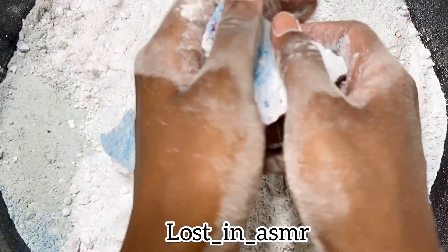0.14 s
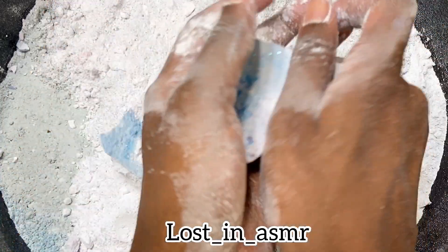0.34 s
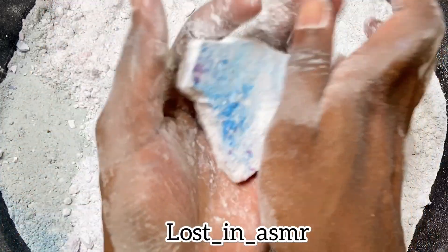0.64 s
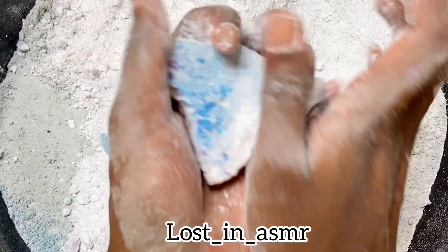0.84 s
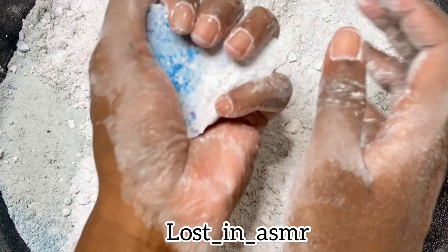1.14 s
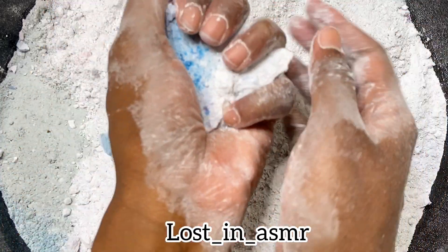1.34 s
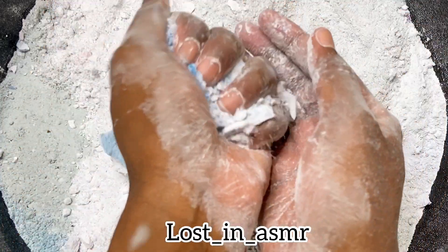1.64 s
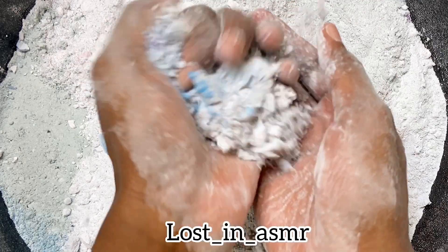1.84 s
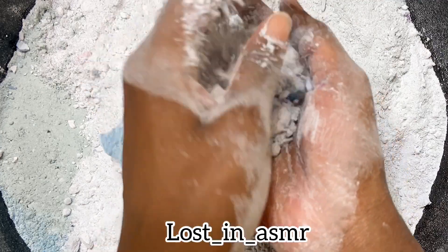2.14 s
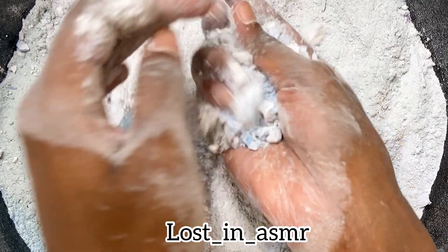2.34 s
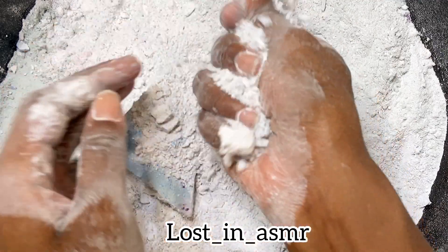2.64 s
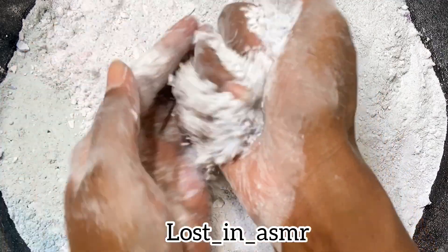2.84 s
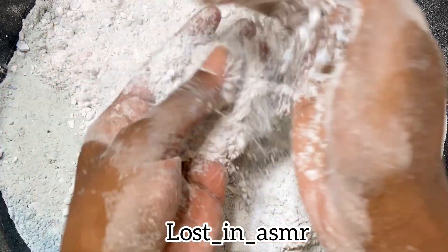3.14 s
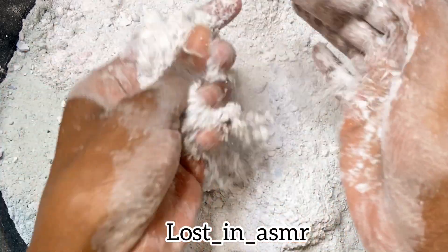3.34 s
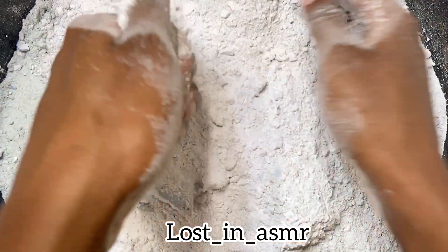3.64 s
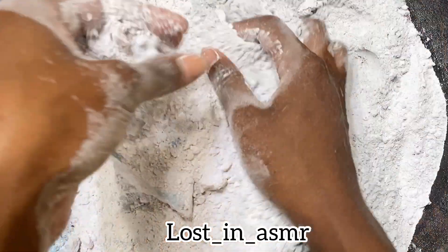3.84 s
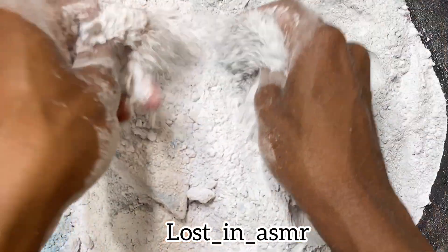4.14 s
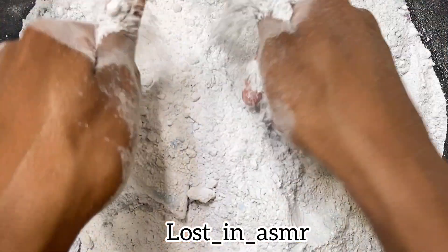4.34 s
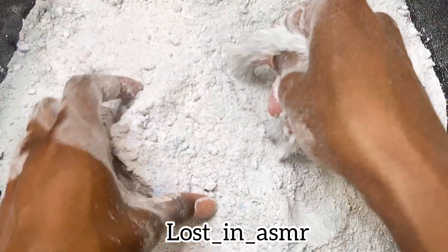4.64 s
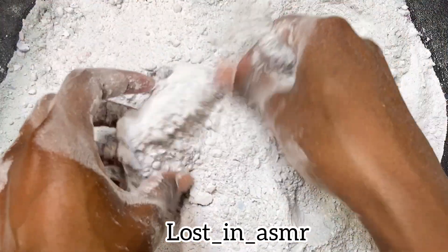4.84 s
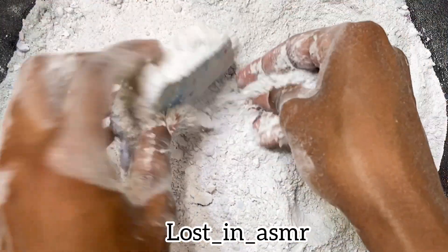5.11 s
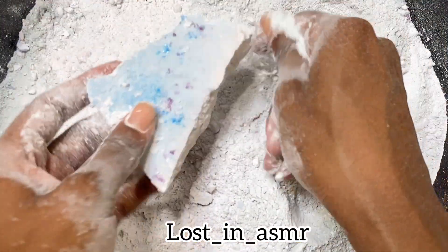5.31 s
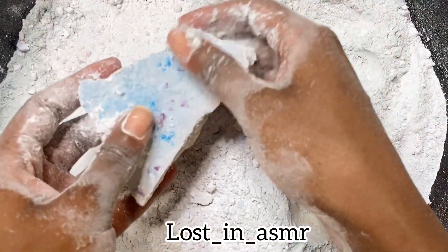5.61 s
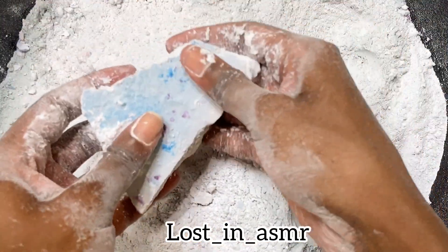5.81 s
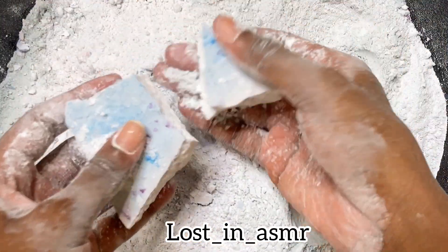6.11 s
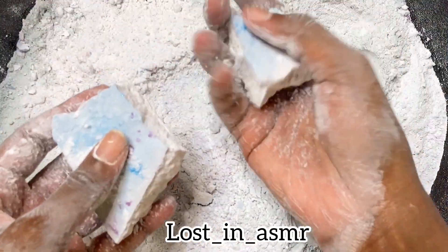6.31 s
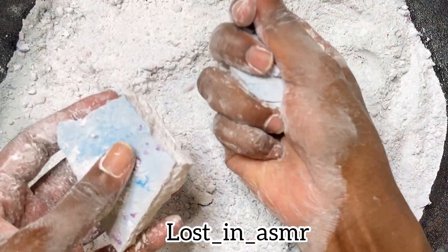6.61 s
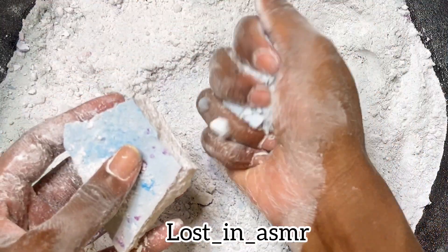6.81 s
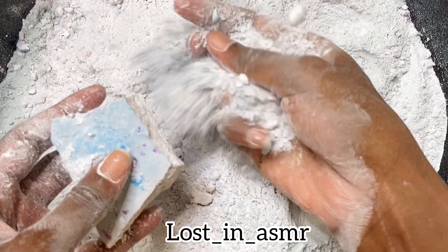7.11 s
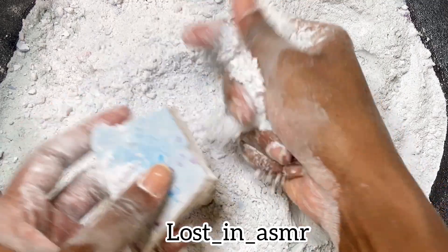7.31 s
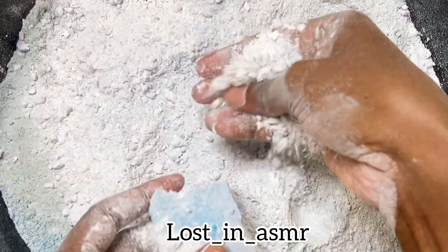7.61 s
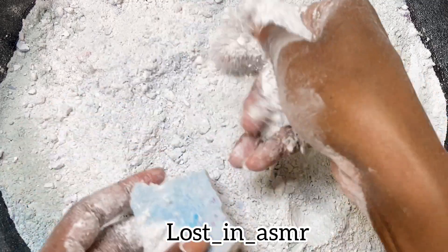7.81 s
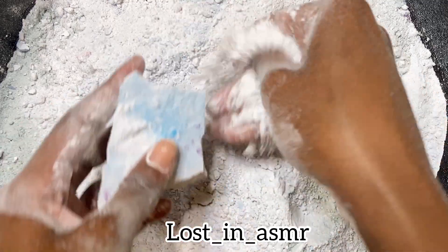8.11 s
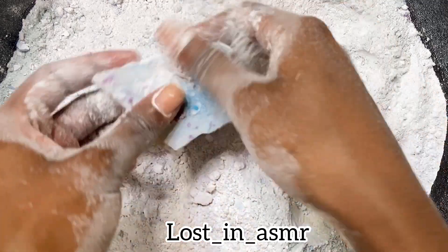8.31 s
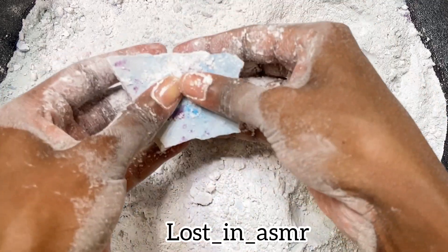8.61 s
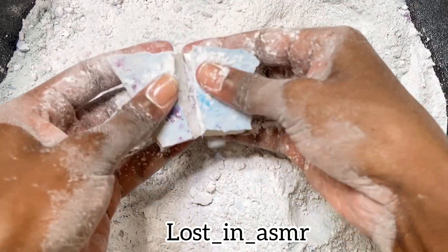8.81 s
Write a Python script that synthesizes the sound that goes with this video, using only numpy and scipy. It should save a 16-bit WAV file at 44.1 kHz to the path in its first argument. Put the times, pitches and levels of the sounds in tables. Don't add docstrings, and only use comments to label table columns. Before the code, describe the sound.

Two hands snap and crush dry blocks of pressed chalk close up, with sharp cracks, crumbling crackles and dusty rubbing over low room rumble.

```python
import sys
import numpy as np
from scipy import signal
from scipy.fft import rfft, irfft, next_fast_len
from scipy.io import wavfile
from scipy.ndimage import uniform_filter1d

SR = 44100
rng = np.random.default_rng(int(sys.argv[2]) if len(sys.argv) > 2 else 0)


def dump_mix(stems):
    frames = np.atleast_2d(stems).T
    limited = np.clip(frames, -1, 1)
    pcm = np.round(limited * 32767).astype(np.int16)
    wavfile.write(sys.argv[1], SR, pcm)


def rack_gain(trim_db):
    fader = np.asarray(trim_db, float)
    return 10 ** (fader / 20)


N = 394694
FFT_SIZE = next_fast_len(N)

# pitch in Hz, pitch wander in Hz.
ROOM_MODES = [(57, 4.24), (110, 7.92)]


def level(x, db):
    return x * rack_gain(db) / np.sqrt(np.mean(x ** 2))


def peak(x, db):
    return x * rack_gain(db) / np.max(np.abs(x))


def edge(x, hz, kind, order=2):
    return signal.sosfilt(signal.butter(order, hz, kind, fs=SR, output="sos"), x)


def resonate(x, modes):
    out = 0
    for k, (hz, width, db) in enumerate(modes):
        b, a = signal.iirpeak(hz, hz / width, fs=SR)
        out = out + (-1) ** k * rack_gain(db) * signal.lfilter(b, a, x)
    return out


def walk(rate):
    k = int(SR / rate)
    steps = np.repeat(rng.standard_normal(N // k + 1), k)
    return 1.41 * uniform_filter1d(uniform_filter1d(steps, k), k)[:N]


def pair(count, like):
    like = np.clip(like, 0, 1)
    shared, left, right = rng.standard_normal((3, count))
    return np.sqrt(like) * shared + np.sqrt(1 - like) * np.array([left, right])


def grains(rate, spread_db, burst_s, like, largest=4):
    when, size = rng.random(N), rng.exponential(size=N)
    starts = (when < rate / SR) * rack_gain(2 * spread_db * np.minimum(size, largest))
    power = signal.lfilter([1], [1, -np.exp(-2 / (burst_s * SR))], starts)
    return np.sqrt(power + 0.2 * np.mean(power)) * pair(N, like)


def burst(rise_s, fall_s, like):
    t = np.arange(4096) / SR - .006
    envelope = np.where(t < 0, np.exp(np.minimum(t, 0) / rise_s), np.exp(-t / fall_s))
    return pair(4096, like) * envelope


def click(rough, rise_s, fall_s):
    impulse = np.arange(4096) == int(.006 * SR)
    return rough * burst(rise_s, fall_s, like=0.6) + impulse


def gestures(table, rise_db_s, fall_db_s):
    t = np.arange(0, N + 64, 64) / SR
    start, hold, db, *others = np.array(table).T[:, :, None]
    early, late = np.maximum(start - t, 0), np.maximum(t - start - hold, 0)
    shape = db - rise_db_s * early - fall_db_s * late
    powers = [np.sum(rack_gain(2 * (shape + more)), axis=0) for more in [0] + others]
    return [np.interp(np.arange(N) / SR, t, power) for power in powers]


def played(table):
    s, *columns = np.transpose(table)
    return [np.interp(np.arange(N) / SR, s, c) for c in columns]


def along(table, hz):
    points, values = np.transpose(table)
    return np.interp(np.log(np.maximum(hz, 1)), np.log(points), values)


def room_modes():
    # start in seconds, hold in seconds, level in dB.
    low_surges = [(0, 0.061, -23.5), (0.29, 0.058, -30.5), (0.676, 0.073, -30.5), (0.88, 0.042, -29),
                  (0.983, 0.22, -34), (1.357, 0.079, -34), (1.698, 0.21, -34.5), (2.27, 0.15, -28),
                  (2.848, 0.11, -26.5), (3.263, 0.036, -30), (3.428, 0.044, -32), (3.738, 0.027, -30),
                  (3.977, 0.1, -29.5), (4.432, 0.2, -30), (4.947, 0.21, -31), (5.994, 0.05, -30),
                  (6.16, 0.11, -29), (6.35, 0.13, -34), (6.593, 0.017, -32), (7.153, 0.082, -27.5),
                  (7.483, 0.1, -33), (8.63, 0.03, -33)]
    high_surges = [(0.45, 0.02, -38), (0.66, 0.056, -33), (1.15, 0.054, -37.5), (1.35, 0.051, -38.5),
                   (1.87, 0.051, -33.5), (2.0, 0.19, -35), (2.46, 0.034, -36.5), (2.79, 0.022, -34),
                   (3.82, 0.18, -36), (4.29, 0.02, -36), (5.33, 0.03, -42), (5.59, 0.04, -33.5),
                   (5.81, 0.04, -33.5), (6.0, 0.035, -42), (6.34, 0.13, -44), (6.86, 0.091, -36.5),
                   (7.4, 0.03, -36), (7.64, 0.19, -35.5), (8.06, 0.068, -36.5), (8.35, 0.027, -34),
                   (8.65, 0.041, -37), (8.87, 0.018, -34.5)]
    calm_db = (-38.5, -44.5)
    out = 0
    for (hz, wander), surges, calm in zip(ROOM_MODES, (low_surges, high_surges), calm_db):
        surge, = gestures(surges, rise_db_s=255, fall_db_s=255)
        size = np.sqrt(surge + rack_gain(2 * (calm + 3.5 * walk(12))))
        phase = 2 * np.pi * np.cumsum(hz + wander / 2 * walk(9)) / SR
        out = out + np.sqrt(2) * np.sin(phase) * size * rack_gain(1.76 * walk(22))
    return out * np.ones((2, 1))


def air():
    # frequency in Hz, level in dB per Hz.
    air_colour = [(15, -46), (25, -1), (58, -1.5), (116, 3.5), (242, -18), (334, -17), (420, -26),
                  (553, -26.5), (936, -51.5), (1210, -69), (1740, -43), (3160, -57), (6000, -76),
                  (7800, -92), (13200, -120)]
    # frequency in Hz, shared part from 0 to 1.
    air_like = [(60, .985), (130, .9), (290, .5), (700, .5)]
    air_db = -46
    hz = np.fft.rfftfreq(FFT_SIZE, 1 / SR)
    like = np.clip(along(air_like, hz), 0, 1)
    shared, left, right = rfft(rng.standard_normal((3, FFT_SIZE)))
    both = np.sqrt(like) * shared + np.sqrt(1 - like) * np.array([left, right])
    both = both * rack_gain(along(air_colour, hz))
    for mode_hz, wander in ROOM_MODES:
        both = both * (1 - 0.49 * np.exp(-((hz - mode_hz) / (3.1 * wander)) ** 2))
    noise = irfft(both, FFT_SIZE)[:, :N]
    band = edge(edge(noise, 130, "high", order=4), 400, "low", order=4)
    return noise * rack_gain(air_db + 4) / np.sqrt(np.mean(band ** 2))


def rubbing():
    # time in seconds, grit in dB, dust relative to grit in dB.
    contact = [(0, -50.5, -9.5), (.85, -55, -4.5), (1.12, -63.5, -5.5), (1.3, -49.5, -13), (2.1, -49, -8.5),
               (3.6, -51, -17), (3.88, -58.5, -1.5), (4.45, -49.5, -13.5), (4.95, -57.5, -6),
               (5.35, -52.5, -8), (5.42, -59, -8), (5.92, -70, -7.5), (5.97, -56.5, -2.5),
               (7.0, -51.5, -10), (8.35, -51.5, -8), (8.5, -73.5, -2), (8.8, -61.5, -15), (8.95, -55, 5.5)]
    # start in seconds, hold in seconds, grit in dB, dust relative to grit in dB.
    strokes = [(0, 0.033, -46, -2.5), (.13, 0.0062, -46, 1), (.6, 0.024, -42, -4.5), (.74, 0.01, -51, -3),
               (.96, 0.014, -49.5, -10.5), (1.2, 0.02, -41.5, -14), (1.34, 0.025, -45.5, -12),
               (1.47, 0.019, -35.5, -17), (1.66, 0.065, -43, -9), (1.87, 0.065, -51, 3),
               (2.25, 0.12, -43.5, -10.5), (2.39, 0.22, -45.5, -8.5), (2.68, 0.054, -43.5, -7),
               (2.77, 0.11, -56, 0), (2.96, 0.13, -53.5, -4), (3.16, 0.076, -49.5, -5.5),
               (3.29, 0.05, -45, -7), (3.38, 0.2, -46, -10), (4.04, 0.057, -42, -11.5),
               (4.19, 0.11, -45, -6), (5.11, 0.017, -46, -3.5), (5.22, 0.057, -48, -5),
               (6.1, 0.024, -52.5, 1), (6.18, 0.032, -53.5, 7.5), (6.27, 0.03, -49, 1),
               (6.36, .03, -46.5, -8), (6.42, 0.12, -40.5, -19), (6.69, 0.048, -38.5, -12),
               (6.78, 0.055, -47, -3.5), (7.1, .11, -43.5, -12), (7.26, 0.054, -46.5, -9.5),
               (7.53, 0.0085, -57, 3), (7.65, 0.085, -44.5, -7), (7.98, 0.2, -47, -4.5),
               (8.68, 0.043, -46, -19), (8.42, 0.014, -52, -3.5), (.38, 0.03, -60.5, 5),
               (4.45, 0.16, -55.5, -4.5), (4.64, 0.082, -49.5, -9.5), (3.95, 0.036, -50, -9),
               (5.82, 0.025, -51.5, -13), (5.96, 0.046, -54.5, -2.5), (8.85, 0.037, -55, 5)]
    swipes = [(.478, .006, -56, 5.5), (.565, 0.039, -46, 4.5), (.772, 0.015, -48.5, 4),
              (.862, 0.007, -47, -4), (.906, .006, -53, 0), (3.71, .02, -55, 1.5), (5.58, 0.05, -53, -3),
              (6.835, 0.0087, -44, 2.5), (6.945, 0.027, -49, 3.5), (1.465, 0.021, -43, -8),
              (6.685, 0.028, -46, -9), (6.895, .01, -56, 5)]
    # centre in Hz, width in Hz, level in dB.
    block = [(2420, 1080, -4), (3290, 620, 3.5), (4820, 4060, -0.5), (6760, 3630, -3)]
    dust_bands = [(7200, 14000, -11), (8800, 6200, 38.5), (15100, 4000, -47)]
    rest_db, rest_dust_db = played(contact)
    slow = gestures(strokes, rise_db_s=301, fall_db_s=290)
    quick = gestures(swipes, rise_db_s=1500, fall_db_s=700)
    drag, drag_dust = np.add(slow, quick)
    grit_size = np.sqrt(drag + rack_gain(2 * rest_db))
    dust_size = np.sqrt(drag_dust + rack_gain(2 * (rest_db + rest_dust_db)))
    coarse = grains(900, spread_db=5.0, burst_s=0.0073, like=0.38, largest=3.03)
    fine = grains(1500, spread_db=5.0, burst_s=0.0078, like=0.73, largest=2.8)
    grit = edge(resonate(coarse, block), 1350, "high")
    dust = edge(resonate(fine, dust_bands), 3300, "high")
    stick_slip = rack_gain(1.17 * walk(30) + 0.21 * walk(25))
    return (grit_size * level(grit, -1.38) + dust_size * level(dust, 7.87)) * stick_slip


def cracks():
    # time in seconds, peak in dB, ring in Hz, grit and
    # thud relative to the peak in dB.
    snaps = [(0.003, -26.5, 576, -9, -8), (0.473, -28.5, 1740, -12, -12), (0.908, -33, 1570, -4, -0.5),
             (1.035, -35, 1590, -15, 1), (1.192, -23, 660, -1, -11), (1.334, -18, 1540, -4.5, -22),
             (1.449, -19.5, 1460, -22, -14), (2.363, -34, 540, -15, 5), (2.497, -19.5, 680, -12, -8.5),
             (2.611, -20.5, 1450, -14, -10), (2.75, -4.5, 895, -43, -13.5), (3.075, -27, 1280, -9, -16),
             (4.079, -31, 616, -16, 4), (5.759, -30, 1950, -12, -11), (5.793, -18.5, 560, -8, -6),
             (6.413, -18, 2440, -13, -13), (6.643, -18, 1230, -26, -9.5), (6.79, -20, 1430, -19, -16),
             (8.648, -10, 530, -16, -6), (8.669, -19.5, 580, -2.5, -6)]
    # time in seconds, peak in dB, ring in Hz, grit
    # relative to peak in dB.
    further_breaks = [(0.863, -43, 3060, 6), (1.175, -13, 810, -4), (1.327, -12, 1140, -10), (1.4, -20, 1420, -8),
                      (1.462, -13.5, 1380, -9), (1.481, -17.5, 1520, -4.5), (1.486, -19, 1500, -8),
                      (1.666, -22.5, 1400, -24), (2.95, -27.5, 1200, -8), (2.987, -21, 710, -18),
                      (3.0, -23, 660, -8), (3.277, -26, 1350, -24), (4.995, -27, 620, -28),
                      (5.158, -26, 1280, -24), (6.44, -10, 1190, -9.5), (6.451, -19, 2130, -12),
                      (6.502, -11, 1350, -14), (6.588, -22, 1390, -11), (6.615, -23.5, 835, -7.5),
                      (6.692, -13, 1530, -9), (6.686, -24.5, 800, -3), (6.699, -18, 1100, -5.5),
                      (6.837, -30.5, 710, 3.5), (6.884, -30.5, 1600, -5), (7.162, -24.5, 1460, -10),
                      (7.582, -23.5, 1420, -16), (8.002, -21, 654, -16)]
    common_thud_db = -18
    breaks = [*snaps, *((*row, common_thud_db) for row in further_breaks)]
    out = np.zeros((2, N + 4096 + 512))
    for s, peak_db, hz, grit_db, thud_db in breaks:
        piece = [(hz, 0.28 * hz, 0), (2.12 * hz, 0.57 * hz, -12), (3300, 2400, -19)]
        ring = resonate(click(.11, 0.00058, 0.0021), piece)
        crumbs = resonate(burst(0.0043, 0.022, like=0.37), [(0.8 * hz, 0.49 * hz, 0), (2400, 1800, -10)])
        body = edge(peak(ring, 0.85) + peak(crumbs, -14.0), 3940, "low", order=3)
        grit = edge(edge(burst(.0008, .002, like=.5), 1900, "high"), 7000, "low", order=3)
        dust = edge(burst(.0012, .0025, like=.9), 6500, "high")
        thud = resonate(burst(0.00077, 0.0096, like=0.92), [(181, 333, 1.0), (340, 425, 0.18)])
        sound = body + peak(grit, grit_db + 5.0) + peak(thud, thud_db - 1.0)
        sound = sound + peak(dust, grit_db)
        at = int((s - .0055) * SR) + 512
        out[:, at:at + 4096] += rack_gain(peak_db) * sound
    return out[:, 512:N + 512]


def scrapes():
    # start in seconds, end in seconds, hollow in Hz, level in dB.
    slides = [(0.087, 0.195, 3800, -47.5), (0.3, 0.34, 1870, -53), (0.496, 0.77, 5350, -51),
              (0.374, 0.88, 3430, -54.5), (0.559, 0.66, 3350, -44.5), (0.54, 0.68, 2370, -59),
              (0.932, 1.0, 1730, -55), (4.958, 5.03, 1470, -47.5), (0.717, .75, 6400, -46.5),
              (0.86, 0.897, 3060, -48), (3.653, 4.122, 220, -45.5), (4.963, 5.05, 714, -48),
              (5.475, 5.553, 1860, -59), (5.579, 5.665, 2120, -53), (5.955, 6.15, 4600, -56.5),
              (6.17, 6.225, 3100, -52), (6.173, 6.225, 5800, -44), (6.345, 6.405, 4700, -46),
              (6.356, 6.41, 2480, -51), (0.106, 0.2, 5330, -45), (6.25, 6.333, 4600, -48),
              (8.291, 8.364, 2850, -53), (8.823, 8.94, 5680, -49.5), (1.35, 1.54, 1540, -44),
              (1.65, 1.76, 1470, -44), (7.09, 7.34, 1510, -48.5), (7.51, 7.78, 1510, -49.5),
              (7.99, 8.1, 1490, -47.5), (2.76, 2.845, 600, -40.5), (8.652, 8.72, 540, -36),
              (5.797, 5.85, 515, -41.5), (6.24, 6.31, 3100, -54), (5.29, 5.35, 3150, -57),
              (5.36, 5.44, 1560, -58), (6.08, 6.15, 6500, -52), (0.56, 0.63, 6800, -50),
              (3.29, 3.33, 2200, -45), (3.2, 3.24, 1430, -47), (7.99, 8.09, 3200, -52),
              (6.45, 6.56, 2270, -44), (4.03, 4.1, 2800, -50)]
    out = np.zeros((2, N))
    for start, end, hz, db in slides:
        count = int((end - start) * SR)
        narrow = resonate(pair(8192 * 3, 0.87), [(hz, 70 + .065 * hz, 0)])
        friction = resonate(narrow, [(hz, 0.32 * hz, 0)])[:, :count]
        sound = friction * rack_gain(3.5 * walk(111.5)[:count])
        swell = np.sqrt(np.sin(np.pi * np.linspace(0, 1, count) ** 0.64))
        at = int(start * SR)
        out[:, at:at + count] += level(sound, db) * swell
    return out


def ticks():
    # time in seconds, peak in dB, ring in Hz.
    single_crumbs = [(0.307, -40.5, 730), (1.549, -36, 910), (1.608, -39, 600), (1.694, -29, 910),
                     (2.627, -25.5, 840), (3.176, -35, 736), (3.212, -35, 740), (4.453, -30, 700),
                     (1.37, -32, 1500), (1.42, -40, 1500), (1.51, -34, 1500), (1.715, -36, 1500),
                     (4.967, -39, 627), (5.048, -36, 600), (5.378, -44, 634), (5.477, -40, 1755),
                     (5.497, -38.5, 1840), (5.66, -49, 727), (6.469, -27, 1900), (6.737, -29, 1410),
                     (7.471, -45, 883), (7.876, -33.5, 730), (7.96, -39, 1490), (2.068, -38, 1490),
                     (2.09, -37, 1500), (2.198, -39, 560), (2.446, -34, 610), (2.49, -31, 1500),
                     (2.677, -47, 600), (3.919, -37, 780), (4.17, -43, 600), (4.181, -35, 600),
                     (4.345, -43, 720), (4.394, -42, 620), (4.418, -32.5, 1010), (4.621, -44, 560),
                     (4.697, -45, 1500), (4.808, -47, 1300), (5.007, -26.5, 680), (5.009, -36, 1540),
                     (5.078, -34, 1600), (5.105, -36, 895), (5.349, -43, 2800), (6.461, -34, 2300),
                     (6.477, -22.5, 1490), (6.485, -28, 2200), (6.512, -29, 2100), (6.531, -34, 1500),
                     (6.55, -33, 1300), (6.581, -25.5, 2200), (6.657, -39, 1100), (6.709, -34, 1900),
                     (6.716, -43, 1200), (6.782, -33, 1450), (6.865, -32, 905), (7.095, -37, 1400),
                     (7.527, -37, 1410), (7.566, -45, 600), (8.132, -35, 2250),
                     (0.48, -39, 11000), (0.93, -30, 6000), (2.496, -26, 5500), (2.56, -31, 6000),
             (3.08, -28.5, 5700), (4.4, -36, 3300), (5.437, -48, 3500), (5.661, -39, 4000),
             (5.699, -48, 4000), (5.805, -28, 7700), (6.467, -20, 5000), (6.737, -34, 6900),
             (6.844, -27, 4300), (7.14, -30, 4500), (8.418, -36.5, 2900), (8.657, -25, 5500),
             (6.692, -20.5, 2300), (6.837, -30, 2900), (6.44, -14.5, 2220), (8.617, -44, 3200),
             (5.497, -39, 3000), (2.75, -22, 2250), (2.75, -27, 4000), (5.793, -25.5, 3400),
             (5.759, -34.5, 4100), (1.445, -27, 3200), (1.212, -34, 4800), (4.465, -29, 2400),
             (3.92, -40, 5000), (2.279, -34, 3100), (1.2, -30, 1500), (1.195, -27, 4000),
                     (2.93, -36, 1350), (3.152, -37, 680), (3.405, -38, 530), (3.518, -33.5, 1030),
             (3.759, -39, 550), (4.089, -31, 520), (4.14, -36, 500), (4.217, -36, 555), (6.972, -45, 1420),
             (7.25, -35, 1460), (7.626, -35, 530), (7.673, -33, 780), (7.7, -28.5, 1500),
             (8.047, -30, 1450), (2.81, -32, 1500), (2.09, -38, 3500), (3.297, -37, 1300),
             (2.765, -21.5, 930), (1.177, -19, 780)]
    out = np.zeros((2, N + 4096))
    for s, peak_db, hz in single_crumbs:
        snap = resonate(click(0.12, 0.00025, 0.002), [(hz, 2.0 * hz, 0)])
        ring = resonate(snap, [(hz, 0.29 * hz, 0), (3500, 3500, -18)])
        sound = edge(ring, min(2500 + 3.9 * hz, 15000), "low")
        at = int((s - .0055) * SR)
        out[:, at:at + 4096] += peak(sound, peak_db + 3.0)
    return out[:, :N]


def crushing():
    # start in seconds, hold in seconds, palm crumbs in dB, finger gaps relative to palms in dB.
    squeezes = [(.92, 0.05, -65, 3), (1.195, 0.018, -43.5, -3.5), (1.345, 0.23, -54.5, 8),
                (1.44, 0.053, -43, -1), (1.64, 0.067, -50, 4.5), (1.84, 0.054, -51.5, 5),
                (2.24, 0.21, -44, 1.5), (2.49, 0.31, -46, 0), (2.77, 0.046, -40.5, -2.5),
                (2.96, 0.32, -50, 2), (3.22, 0.33, -50, 0.5), (3.68, 0.25, -47.5, -2), (3.92, 0.29, -47, 1),
                (4.41, 0.24, -44.5, -3.5), (4.97, 0.047, -47.5, -2.5), (4.3, 0.066, -55, -3),
                (5.06, 0.15, -48, 0.5), (2.07, 0.075, -56, 3), (4.8, 0.031, -55.5, 5.5),
                (6.97, .02, -57, 8.5), (5.8, .01, -50, -30), (6.44, 0.17, -52, 8), (6.69, 0.17, -45.5, 2.5),
                (7.09, 0.2, -44, -0.5), (7.48, 0.036, -60, 5.5), (7.56, 0.17, -44, -1.5),
                (7.87, .02, -49.5, 1.5), (7.99, 0.059, -43, 1), (8.23, 0.024, -58.5, -1),
                (8.66, 0.04, -45.5, -28)]
    # centre in Hz, width in Hz, level in dB.
    palms = [(246, 230, -5.5), (600, 230, 5), (873, 430, -2.5)]
    finger_gaps = [(1060, 670, -5), (1523, 245, 2.5), (2250, 2140, -8.5)]
    open_palm_db, open_finger_db = -63, -70
    grip = rack_gain(-39)
    palm_power, finger_power = gestures(squeezes, rise_db_s=323, fall_db_s=110)
    palm_size = np.minimum(np.sqrt(palm_power + rack_gain(2 * open_palm_db)), grip)
    finger_size = np.minimum(np.sqrt(finger_power + rack_gain(2 * open_finger_db)), grip)
    crumbs = grains(380, spread_db=3.0, burst_s=0.0031, like=0.62, largest=2.5)
    palm = edge(edge(resonate(crumbs, palms), 260, "high"), 1800, "low")
    others = crumbs * rng.choice([-1, 1], N)
    finger = edge(edge(resonate(others, finger_gaps), 620, "high"), 2780, "low")
    swarm = palm_size * level(palm, 0.19) + finger_size * level(finger, 0.83)
    return swarm * rack_gain(1.76 * walk(20))


def scene():
    room = room_modes() + air()
    chalk = rubbing() + cracks() + scrapes() + ticks() + crushing()
    t, t60_s = np.arange(8192) / SR, .17
    decay = np.exp(-np.log(1000) * t / t60_s) * (t > .003)
    tail = edge(rng.standard_normal((2, 8192)) * decay, 2500, "low", order=1)
    tail = tail / np.sqrt(np.sum(tail ** 2) / 2)
    wet = signal.fftconvolve(chalk, tail, axes=1)[:, :N]
    return chalk + rack_gain(-14.5) * wet + room


def top_cut(x):
    return signal.sosfilt(signal.butter(12, 15730, fs=SR, output="sos"), x)


def record(dry):
    # frequency in Hz, left minus right in dB.
    port_balance = [(60, -.9), (110, -1.5), (200, -2.5), (380, -1), (700, .3), (1300, -2), (2400, -3.5),
                    (4400, -4.5)]
    # frequency in Hz, lead of the left port in radians.
    port_phase = [(1500, 0.014), (2500, -1.15), (4200, -0.81), (6000, -1.2)]
    merge_hz, port_lag_s, top_hz = 6700, 162e-6, 15900
    hz = np.fft.rfftfreq(FFT_SIZE, 1 / SR)
    left, right = rfft(edge(dry, 46, "high", order=4), FFT_SIZE)
    merged = np.clip((hz - merge_hz) / 1600 + .5, 0, .92)
    apart, together = np.cos(merged * np.pi / 2), np.sin(merged * np.pi / 2)
    treble = (left + right) / 2 * together
    balance_db = along(port_balance, hz) / 2
    left = left * apart * rack_gain(balance_db) + treble
    right = right * apart * rack_gain(-balance_db) * np.exp(-1j * along(port_phase, hz))
    right = right + treble * np.exp(-2j * np.pi * hz * port_lag_s)
    top = np.clip((top_hz - hz) / 200, 0, 1)
    mix = irfft(np.array([left, right]) * top, FFT_SIZE)[:, :N]
    return top_cut(mix)


dry = scene()
out = record(dry)
dump_mix(out)
```